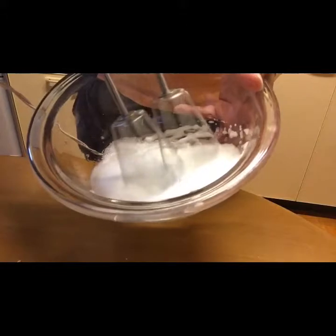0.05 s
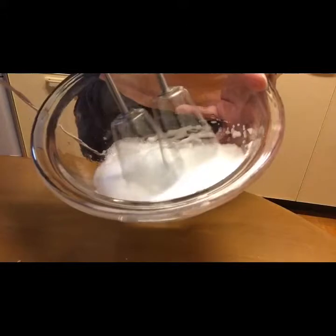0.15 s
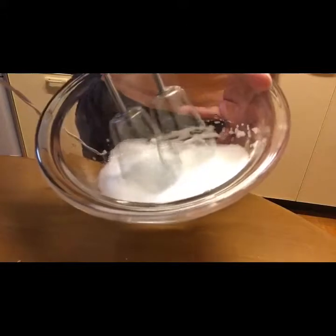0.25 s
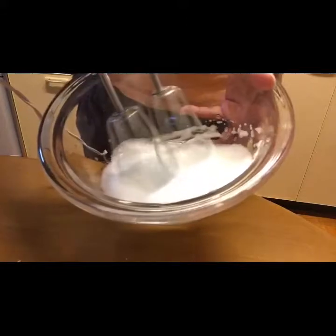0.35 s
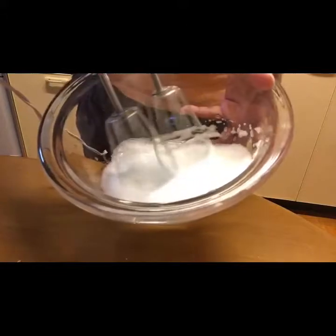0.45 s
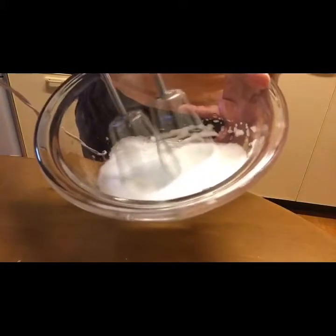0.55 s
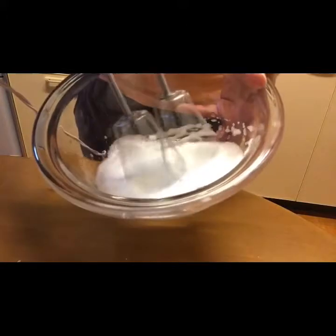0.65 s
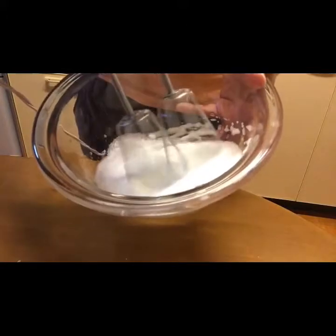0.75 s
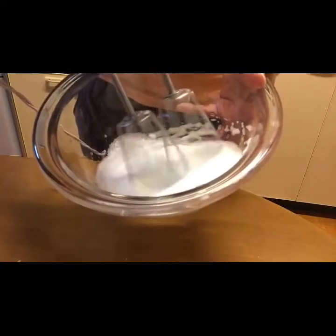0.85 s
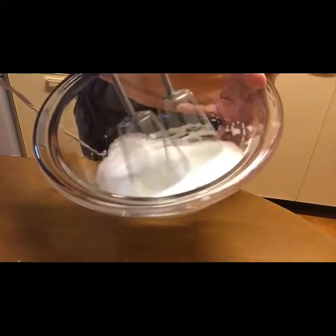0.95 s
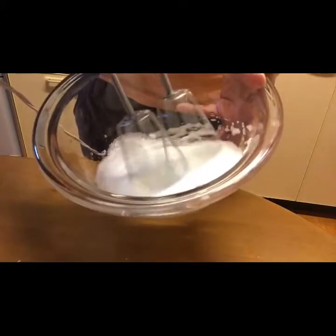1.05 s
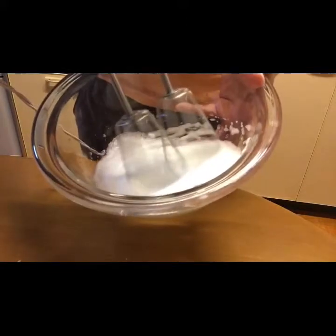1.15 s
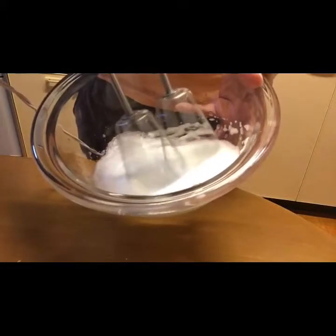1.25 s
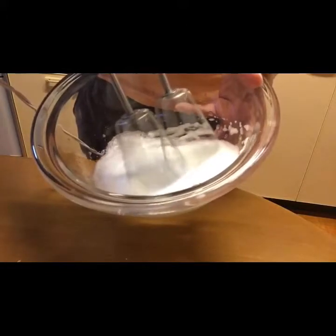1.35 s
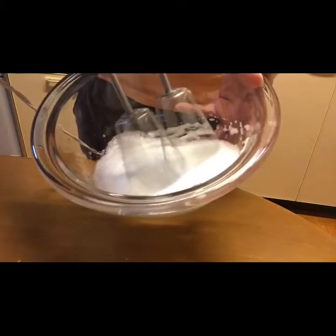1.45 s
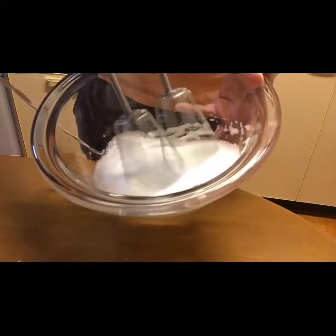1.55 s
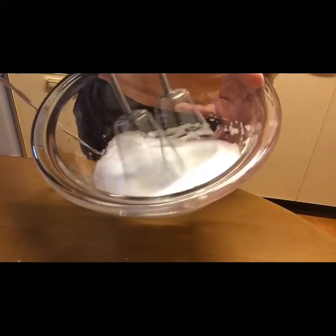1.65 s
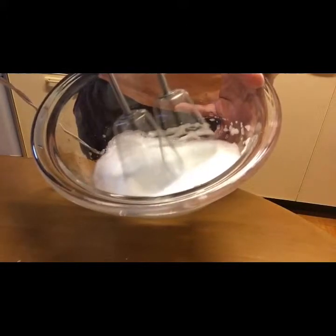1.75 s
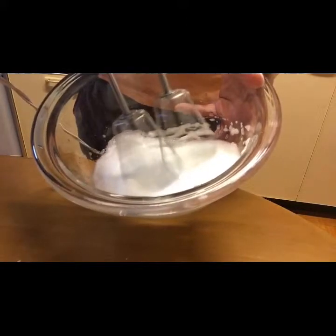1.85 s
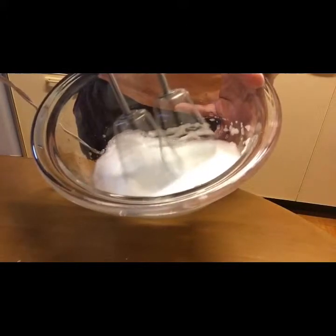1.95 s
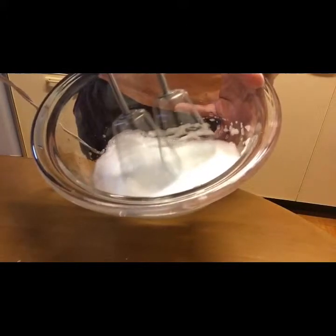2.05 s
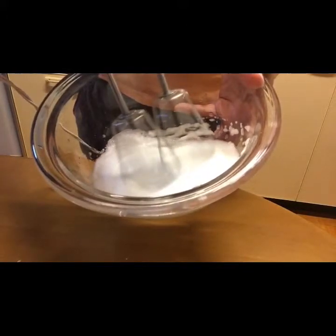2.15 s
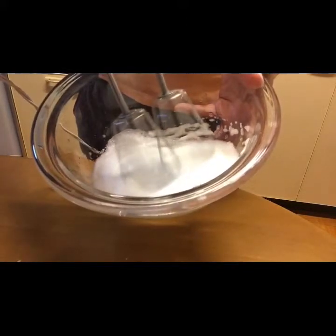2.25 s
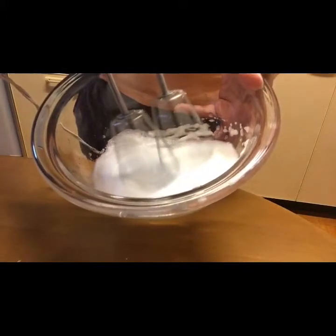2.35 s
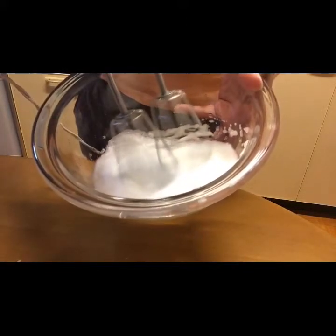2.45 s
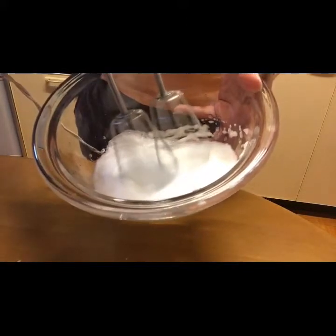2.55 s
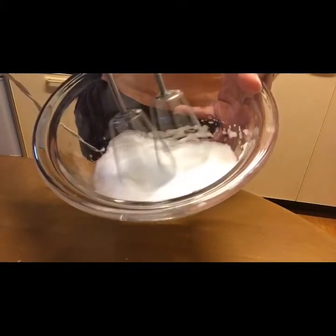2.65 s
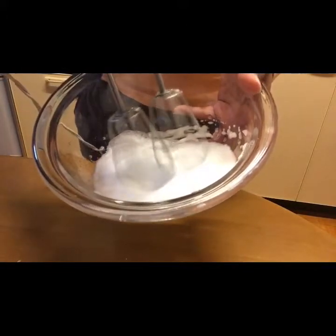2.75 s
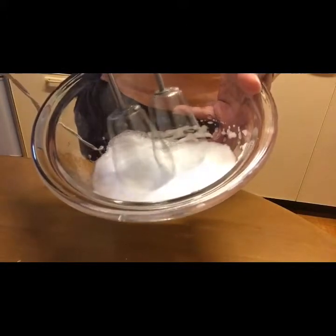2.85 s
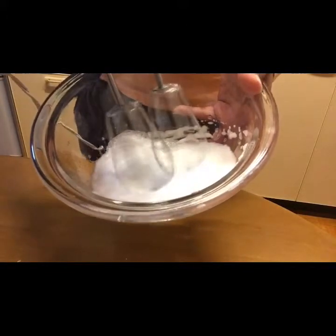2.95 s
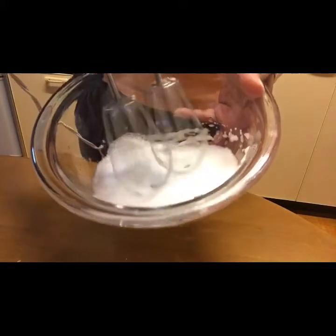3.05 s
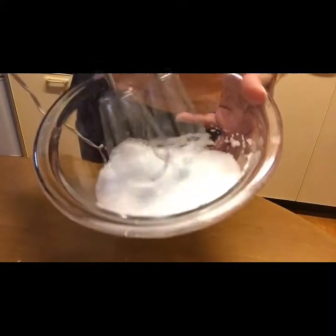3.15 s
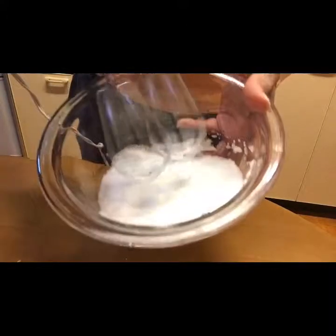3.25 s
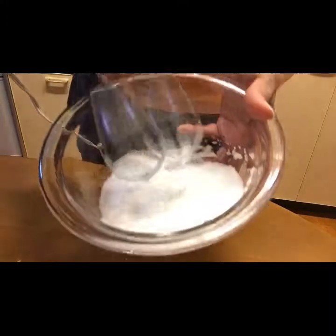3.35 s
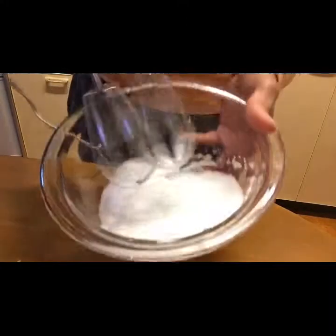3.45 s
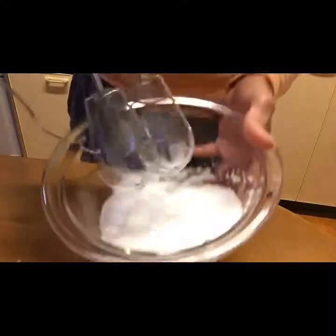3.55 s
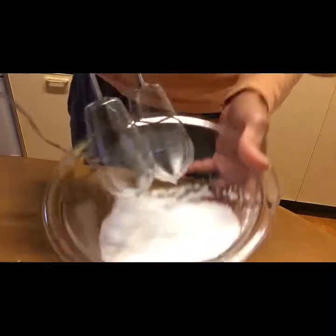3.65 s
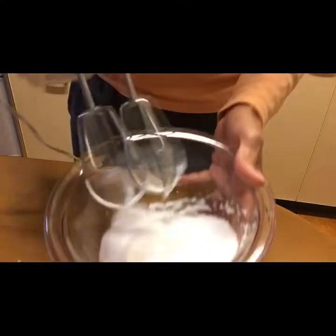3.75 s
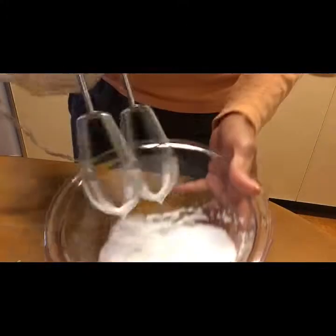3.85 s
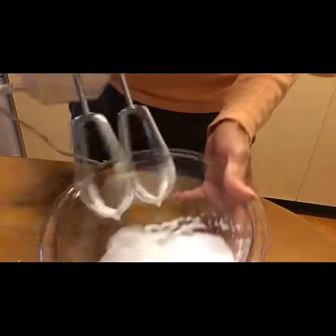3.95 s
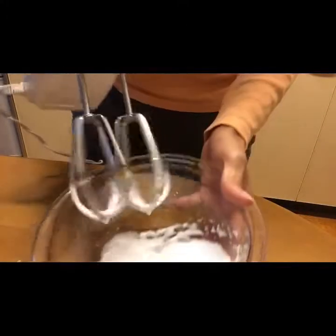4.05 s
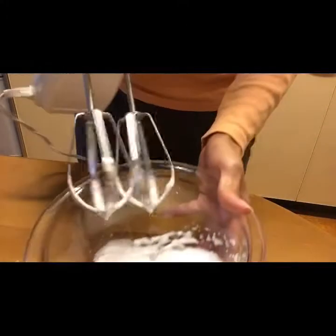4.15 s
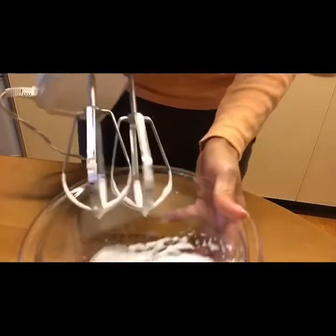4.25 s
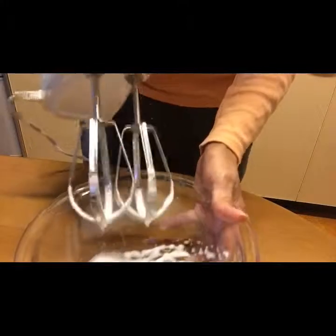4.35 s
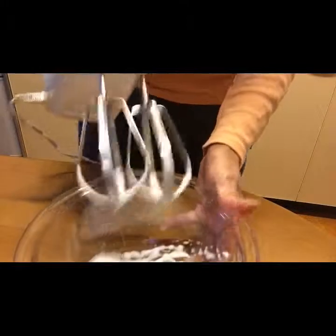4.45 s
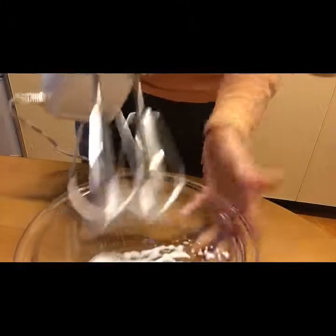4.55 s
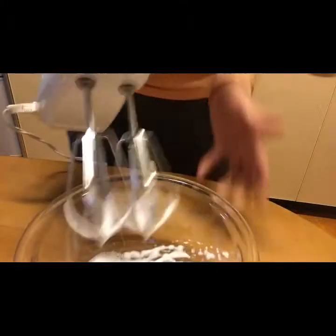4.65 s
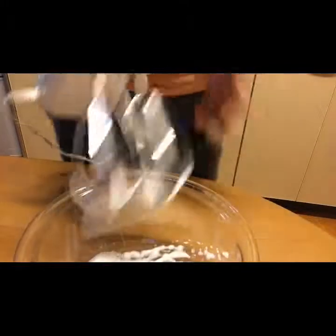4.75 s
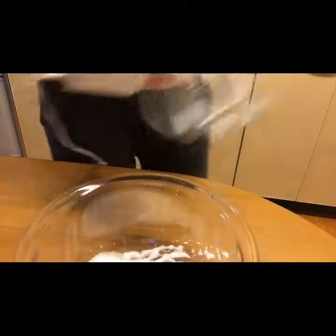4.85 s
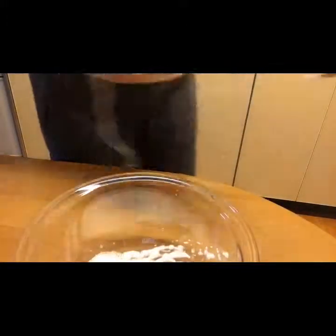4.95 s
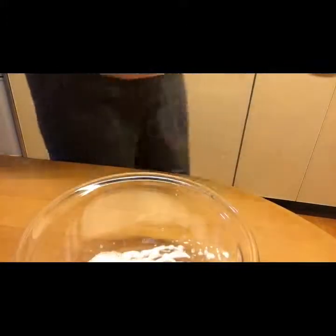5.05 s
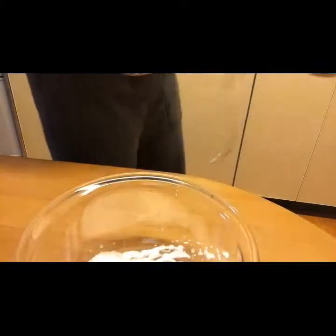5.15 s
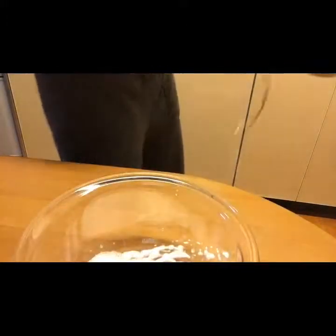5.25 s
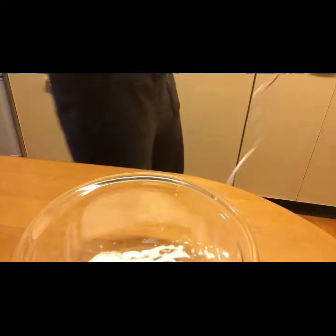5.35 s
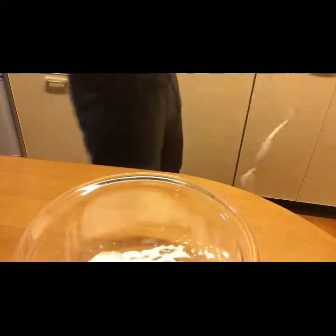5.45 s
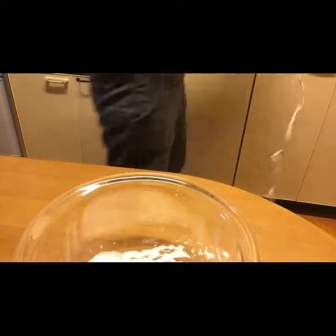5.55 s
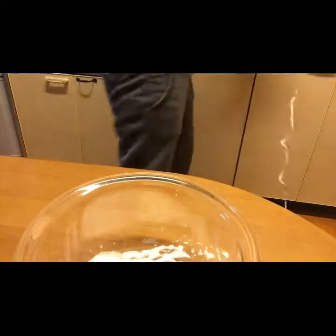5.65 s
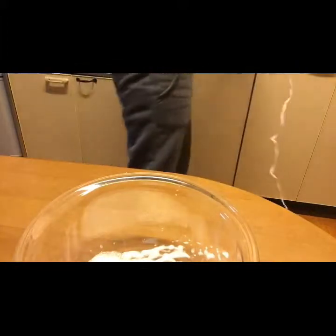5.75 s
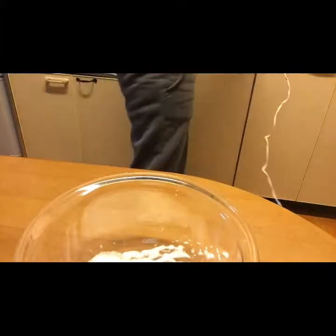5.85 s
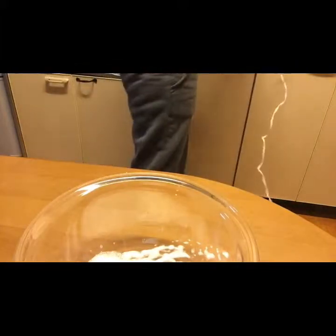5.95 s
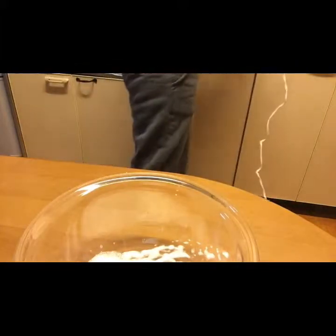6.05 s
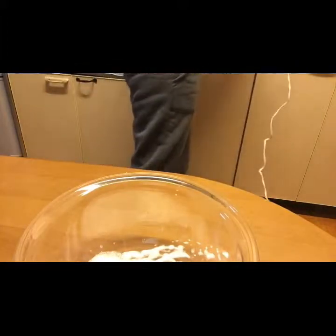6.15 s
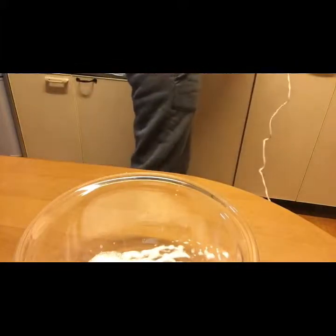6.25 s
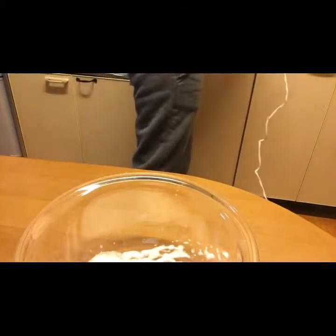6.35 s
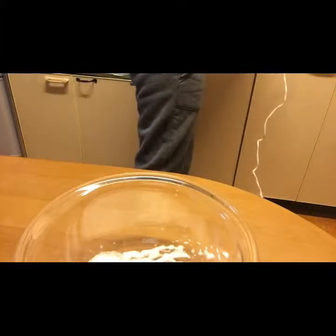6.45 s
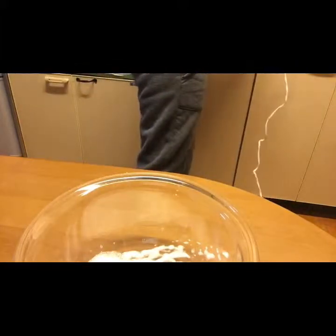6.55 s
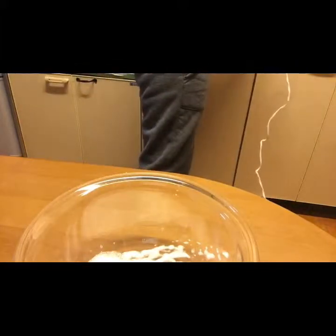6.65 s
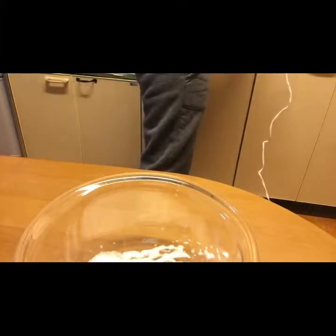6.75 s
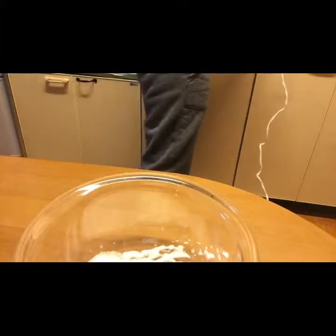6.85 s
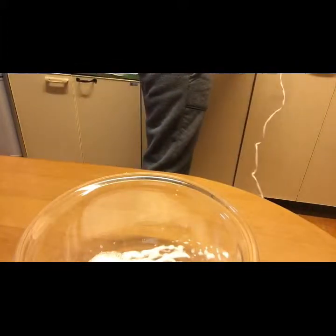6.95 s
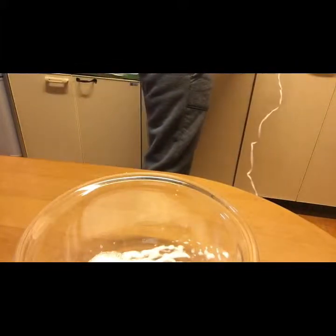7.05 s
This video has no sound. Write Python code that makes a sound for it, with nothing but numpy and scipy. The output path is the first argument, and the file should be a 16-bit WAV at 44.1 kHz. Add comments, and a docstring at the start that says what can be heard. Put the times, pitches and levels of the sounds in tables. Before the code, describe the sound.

Close to the microphone in a small kitchen, a hand mixer runs with a steady motor whine and gear rattle. A few switch clicks slow it, and the beaters tick quickly on a glass bowl as the whine sinks away. Two sharp knocks follow as the bowl is set on a wooden table, with a short ring and boom. Then come quiet plastic taps, rustling clothes and dull thuds.

```python
"""Hand mixer in a glass bowl.

An electric hand mixer whisks egg white in a small kitchen: the motor whines, gears rattle, blades churn.
Its switch clicks down step by step, the beater wires graze the glass and the motor coasts to a stop.
The bowl lands on the wooden table in two knocks; the glass rings and the table top booms.
The mixer is carried off and put aside, with plastic taps, cloth rustle and dull thuds."""
import sys
import numpy as np
from scipy import signal
from scipy.fft import rfft, irfft
from scipy.io import wavfile
from scipy.ndimage import map_coordinates

SR = 44100
rng = np.random.default_rng(int(sys.argv[2]) if len(sys.argv) > 2 else 0)


def master_out(mix):
    """Clip the mix to full scale and print it as 16-bit PCM to the path in sys.argv[1]."""
    frames = np.transpose(np.atleast_2d(mix))
    ceiling = np.clip(frames, -1, 1)
    pcm = np.round(ceiling * 32767).astype(np.int16)
    wavfile.write(sys.argv[1], SR, pcm)


N = 313992
TIME = np.arange(N) / SR
GRID_HZ = np.maximum(np.arange(8193) * SR / 16384, 1)
FULL_TURNS_PER_S, MAINS_HZ = 370.2, 50

# Resonances that swell a tone sweeping across them. Each row: centre in Hz, width in Hz, gain in dB.
SINGING = [(327, 26, 6), (1100, 180, 7.5), (1340, 83, 5.5), (7830, 560, 15.5), (11560, 930, 8)]
# Peaks and hollows of the housing. Each row: centre in Hz, width in Hz, gain in dB.
HOUSING = [(514, 84, -7), (602, 120, 3.5), (860, 130, -4), (2080, 100, 5.5), (2517, 210, 6.5),
           (2760, 140, -1.5), (3030, 260, 9), (3845, 150, -6), (4530, 340, 3), (4900, 190, -15.5),
           (5370, 300, 5), (8700, 300, -1.5), (9300, 500, 4.5), (10200, 430, -4.5)]
# Switch detents, the last is "off". Each row: time in seconds, level in dB, slowing in turns/s per second.
DETENTS = [(1.6099, -15.5, 54), (2.028, -14, 90), (2.3583, -15.5, 131), (2.5835, -24, 179)]
OFF_S = DETENTS[-1][0]
# Spectra of a hard snap and of a knock on plastic. Each row: frequency in Hz, level in dB.
SNAP = [(1500, -26), (4000, -6.5), (8000, -2), (11000, -6), (16000, -6.5)]
PLASTIC = [(300, -16), (850, 1), (1100, 3.5), (1350, 10), (1600, 5.5), (1860, 8), (2500, 0), (3400, 0.5),
           (5000, -6), (7000, -8), (10000, -46.5), (15000, -40.5)]


def from_db(db):
    """Decibels to gain."""
    return 10 ** (np.asarray(db) / 20)


def unit_rms(x):
    """Scale to unit power."""
    return x / np.sqrt(np.mean(x ** 2) + 1e-20)


def at_hz(points, hz):
    """Interpolate a table over log frequency."""
    knots_hz, values = np.transpose(points)
    return np.interp(np.log(hz), np.log(knots_hz), values)


def humps(rows, x):
    """Sum of bell curves, widths taken at half height."""
    return sum(height * 0.5 ** ((2 * (x - centre) / width) ** 2) for centre, width, height in rows)


def response(spectrum, resonances=()):
    """Minimum-phase impulse response of a spectrum, falling away beyond its ends."""
    octaves_below = np.maximum(np.log2(spectrum[0][0] / GRID_HZ), 0)
    octaves_above = np.maximum(np.log2(GRID_HZ / spectrum[-1][0]), 0)
    rolloff_db = 18 * np.minimum(octaves_below + octaves_above, 3)
    db = at_hz(spectrum, GRID_HZ) + humps(resonances, GRID_HZ) - rolloff_db
    cepstrum = irfft(np.log(from_db(db)))
    bins = len(GRID_HZ)
    causal = 2 * cepstrum[:bins] * (np.arange(bins) > 0)
    return irfft(np.exp(rfft(causal, len(cepstrum))))[:bins]


def through(x, impulse):
    """Convolve and trim to the scene."""
    return signal.fftconvolve(x, impulse)[:N]


def hiss(spectrum, resonances=(), gate=1):
    """Unit-power noise, modulated by the gate and then coloured."""
    return unit_rms(through(gate * rng.standard_normal(N), response(spectrum, resonances)))


def drift(rate_hz):
    """Smooth random curve of unit power, up to about this rate."""
    knots = rng.standard_normal(N // 20)
    return unit_rms(map_coordinates(knots, [TIME * rate_hz * 2], order=3, mode="wrap"))


def clicks(rows, db_column=1):
    """One impulse per row, timed by its first column."""
    out = np.zeros(N)
    for row in rows:
        out[int(row[0] * SR)] += from_db(row[db_column])
    return out


def blow(train, spectrum, resonances=()):
    """Each impulse becomes a short coloured blow of the same height."""
    impulse = response(spectrum, resonances)
    return through(train, impulse / np.abs(impulse).max())


def chatter(train, decay_s, share):
    """A hard contact spreads its energy over a dying spray of tiny rebounds."""
    spray = rng.standard_normal(SR // 10) * np.exp(-TIME[:SR // 10] / decay_s)
    rebounds = through(train, spray / np.linalg.norm(spray))
    return (train + share * rebounds) / np.hypot(1, share)


def ringing(modes):
    """Half a second of decaying sines with alternating signs."""
    t = TIME[:SR // 2]
    return sum((-1) ** k * from_db(db - 60 * t / t60_s) * np.sin(2 * np.pi * hz * t)
               for k, (hz, db, t60_s) in enumerate(modes))


def kitchen(x, build_s=0.0044):
    """Diffuse reflections that build up quickly and die sooner in the treble."""
    # Each row: frequency in Hz, T60 in seconds.
    decay = [(100, 0.38), (400, 0.37), (1200, 0.2), (4000, 0.23), (8000, 0.19), (15000, 0.094)]
    t, edges_hz = TIME[:SR], np.geomspace(20, SR / 2, 11)
    white, hz = rfft(rng.standard_normal(SR)), np.arange(SR // 2 + 1)
    tail = 0
    for low, high in zip(edges_hz, edges_hz[1:]):
        band = irfft(white * (hz >= low) * (hz < high))
        tail += band * from_db(-60 * t / at_hz(decay, np.sqrt(low * high)))
    tail *= 1 - np.exp(-(t / build_s) ** 2)
    return through(x, tail / np.linalg.norm(tail))


def room_tone():
    """Faint kitchen noise with a hum."""
    # Each row: frequency in Hz, relative density in dB.
    spectrum = [(15, -33.5), (25, -10.5), (59, -9.5), (180, -0.5), (309, -9.5), (503, -13), (591, -17.5),
                (887, -13), (988, -19), (1520, -16), (2000, -22.5), (4250, -34), (4740, -36), (5140, -36.5),
                (16000, -57)]
    # Each row: centre in Hz, width in Hz, gain in dB.
    hum = [(167, 39, 10), (1370, 250, 4)]
    return from_db(-51.5) * hiss(spectrum, hum)


def cloth(attack_s=0.053, release_s=0.049):
    """Clothes rub: each stroke swells, holds and dies away, roughened by the folds."""
    # Each row: start in seconds, length in seconds, rustle in dB, fine swish in dB.
    strokes = [(4.096, 0.53, -62.5, -74), (4.83, 0.11, -54, -74), (5.016, 0.23, -70, -75),
               (5.456, 0.34, -62, -88), (5.8, 0.29, -63.5, -69), (6.74, 0.073, -67.5, -89)]
    # Each row: frequency in Hz, relative density in dB.
    rustle_spectrum = [(2000, 5), (3500, 3), (6000, -2), (8000, -12.5), (10000, -17)]
    swish_spectrum = [(7000, 10), (10000, 4), (16000, 2)]
    rustle = swish = 0
    for start_s, length_s, rustle_db, swish_db in strokes:
        rise = np.clip((TIME - start_s) / attack_s, 0, 1)
        fall = np.exp(-np.maximum(TIME - start_s - length_s, 0) / release_s)
        rustle += from_db(rustle_db) * rise * fall
        swish += from_db(swish_db) * rise * fall
    folds = from_db(1.5 * drift(44))
    return rustle * hiss(rustle_spectrum, gate=folds) + swish * hiss(swish_spectrum, gate=folds)


def thuds():
    """Steps and things put down, each with one low resonance."""
    # Each row: time in seconds, relative level in dB, boom in Hz.
    impacts = [(5.17, -38, 276), (5.55, -47, 95), (6.382, -29.5, 180), (6.402, -29, 174),
               (6.445, -36.5, 129), (6.521, -52, 140), (6.781, -49.5, 159), (6.88, -50, 65),
               (6.934, -49, 120), (7.08, -40.5, 247)]
    # Each row: frequency in Hz, level in dB.
    spectrum = [(25, 0), (60, 10.5), (110, 7), (190, 7), (300, 8.5), (600, 1), (1400, -6.5), (3000, -25),
                (8000, -70)]
    direct = sum(blow(clicks([(s, db)]), spectrum, [(hz, 90, 13)]) for s, db, hz in impacts)
    return from_db(3) * direct + from_db(1.5) * kitchen(direct)


def taps():
    """The plastic body and cord tap against things, wetter when far away."""
    # Each row: time in seconds, relative level in dB, room offset in dB, bright edge offset in dB.
    contacts = [(3.763, -30.5, 1, -15), (4.676, -45, -16, -22), (4.709, -40, 1.5, -15),
                (4.903, -46, 12.5, -7), (4.9707, -24.5, -10, 3.5), (4.974, -23, -4.5, -18),
                (5.167, -37, 3, -14), (6.0112, -35, 15, 0.5), (6.0153, -28.5, -14, 4.5),
                (6.378, -39, 5.5, -4.5), (6.905, -44, 4, -15), (7.076, -53, 5, -27)]
    # Each row: frequency in Hz, level in dB.
    edge_spectrum = [(3000, -21), (5500, -0.5), (7000, -0.5), (8200, -11), (10000, -18.5), (15500, -32)]

    def strike(rows):
        return blow(clicks(rows), PLASTIC) + blow(clicks(rows, db_column=2), edge_spectrum)

    near = strike([(s, db, db + edge) for s, db, _, edge in contacts])
    far = strike([(s, db + room, db + room + edge) for s, db, room, edge in contacts])
    return from_db(7.5) * chatter(near, decay_s=0.0036, share=8.8) + from_db(3) * kitchen(far)


def bowl():
    """The glass base knocks on the wood, rings and grinds as it rocks; the table top booms."""
    # Each row: time in seconds, then relative levels in dB of crack, glass ring, table boom, grit.
    knocks = [(4.0160, -2.5, -14, -10.5, -27), (4.0240, -26, -42, -17.5, -18), (4.047, -32, -39, -39, -22),
              (4.070, -19, -36, -27, -21), (4.4225, -8, -11.5, -23, -24.5)]
    # Each row: frequency in Hz, level in dB, T60 in seconds.
    glass_modes = [(668, -6.5, 0.1), (840, 1.5, 0.036), (1004, -4.5, 0.061), (1465, -1.5, 0.042),
                   (1660, -13, 0.063), (1973, -4.5, 0.024), (2480, -18, 0.027), (2870, -33, 0.15),
                   (3540, -32, 0.19), (4460, -31, 0.14), (4700, -46, 0.11), (5690, -23, 0.11),
                   (5600, -30, 0.038), (6300, -32, 0.12), (6760, -32, .06)]
    table_modes = [(65, -17, 0.24), (144.6, -6, 0.27), (205.5, 3.5, 0.077), (327, -0.5, 0.086),
                   (394.4, -4.5, 0.16), (512, -9, 0.1)]
    # Each row: frequency in Hz, level in dB.
    crack_spectrum = [(45, -7), (150, -4.5), (400, 3.5), (800, -3), (1400, -4.5), (2300, -12),
                      (3000, -17.5), (4200, -25.5), (6000, -20.5), (7500, -42), (9500, -38), (15000, -68)]
    crack = blow(chatter(clicks(knocks), decay_s=0.004, share=1.6), crack_spectrum)
    glass = through(clicks(knocks, db_column=2), ringing(glass_modes))
    boom = through(clicks(knocks, db_column=3), ringing(table_modes))
    grit = blow(chatter(clicks(knocks, db_column=4), decay_s=0.02, share=8.7), SNAP)
    room = from_db(0.5) * kitchen(crack) + from_db(-11) * kitchen(boom + glass)
    return from_db(4.5) * crack + glass + boom + grit + room


def grazes():
    """Beater wire on glass: a clack and a ping, its modes weighted anew at each touch."""
    # Each row: time in seconds, relative level in dB.
    touches = [(2.49, -18), (2.5309, -24), (2.5504, -19), (2.6049, -19), (2.6365, -18), (2.684, -18.5),
               (2.6953, -17), (2.716, -15.5), (2.8052, -19.5), (2.8194, -18.5), (2.8633, -30),
               (2.8958, -21)]
    # Each row: frequency in Hz, level in dB, T60 in seconds.
    wire_modes = [(1013, 2, 0.1), (1580, -5.5, 0.12), (2440, -9, .06), (3300, -14, .06), (3410, 0.5, 0.05),
                  (5300, -17, 0.049), (6430, -6.5, .07), (8600, -14.5, 0.056), (9120, -15, 0.1),
                  (9570, -19, .05), (10620, -17, 0.095), (11730, -22, .05), (13720, -15, .05)]
    scatter_db = rng.normal(0, 3, (len(touches), len(wire_modes)))
    contact = chatter(clicks(touches), decay_s=0.0046, share=3.6)
    out = from_db(5.5) * blow(contact, PLASTIC) + from_db(-8) * blow(contact, SNAP)
    for (s, touch_db), extras_db in zip(touches, scatter_db):
        ping = ringing([(hz, db + extra, t60_s) for (hz, db, t60_s), extra in zip(wire_modes, extras_db)])
        start = int(s * SR)
        out[start:start + len(ping)] += from_db(touch_db - 7.5) * ping
    return out


def switch():
    """The slider snaps from one detent to the next."""
    snap = blow(chatter(clicks(DETENTS), decay_s=0.0044, share=3), SNAP)
    return from_db(10) * snap + from_db(-2.5) * kitchen(snap)


def motor_speed(drag_per_s=0.09):
    """Turns per second: sags faster after each detent, then coasts against friction and air drag."""
    # The motor races a little as the load eases. Each row: centre and width in seconds, extra turns/s.
    easing = [(1.38, 0.44, 2.7)]
    slowing = np.zeros(N)
    for s, _, rate in DETENTS:
        slowing[int(s * SR):] = rate
    slowing *= np.exp(-drag_per_s * np.maximum(TIME - OFF_S, 0))
    speed = FULL_TURNS_PER_S + humps(easing, TIME) - np.cumsum(slowing) / SR
    return np.maximum(speed, 1) * (1 + 0.00057 * drift(15))


def speed_gain(speed, full_db, half_loss_db, bend):
    """Drive noise falls with speed; a bend of 1 loses the same dB at every halving."""
    halvings = np.maximum(np.log2(FULL_TURNS_PER_S / speed), 0)
    return from_db(full_db - half_loss_db * halvings ** bend)


def bearings(speed):
    """A thin sliding hiss that lasts to the final turns."""
    # Each row: frequency in Hz, relative density in dB.
    spectrum = [(3600, -10.5), (4400, -1.5), (5000, -15.5), (6300, -13.5), (8000, -23), (15000, -27.5)]
    return speed_gain(speed, full_db=-47.5, half_loss_db=4.4, bend=0.93) * hiss(spectrum)


def brushes(speed, spark_depth=0.098):
    """The brushes hiss; under power their sparks pulse at twice the mains frequency."""
    # Each row: frequency in Hz, relative density in dB.
    spectrum = [(3820, -33), (6500, -4), (7790, -6.5), (8460, -10), (9550, -13), (10100, -11), (11000, -13),
                (15100, -15), (16000, -23)]
    sparks = 1 + spark_depth * np.cos(2 * np.pi * 2 * MAINS_HZ * TIME) * (TIME < OFF_S)
    return speed_gain(speed, full_db=-35, half_loss_db=21, bend=1) * hiss(spectrum, HOUSING, sparks)


def beaters(speed, blades, lift_s=2.3, rise_s=0.25):
    """Lifted out of the foam, the beaters hum and drive the singing resonances."""
    # Each row: frequency in Hz, relative density in dB.
    spectrum = [(850, -32.5), (1080, -6), (1170, -5), (1290, -3), (1500, -24.5)]
    lifted = np.clip((TIME - lift_s) / rise_s, 0, 1)
    singing = from_db(0.79 * humps(SINGING, 4 * speed))
    gain = speed_gain(speed, full_db=-39, half_loss_db=3.9, bend=2.4)
    return lifted * singing * gain * hiss(spectrum, gate=blades)


def churn(speed, pulses):
    """The blades churn the foam: pulsing noise, coloured by the housing."""
    # Each row: frequency in Hz, relative density in dB.
    spectrum = [(24, -59.5), (40, -25.5), (184, -14), (232, -6.5), (292, -8), (369, -4.5), (497, -8),
                (727, -5.5), (790, -6), (887, -7.5), (1080, -2), (1180, -4), (1430, 1.5), (1870, -2.5),
                (2100, -7), (2730, -38), (4620, -120)]
    return speed_gain(speed, full_db=-26.5, half_loss_db=9.6, bend=1.18) * hiss(spectrum, HOUSING, pulses)


def gears(speed, teeth, shaft_rad):
    """Gears rattle in the housing; play in the beater shafts throbs once a turn."""
    # Each row: frequency in Hz, relative density in dB.
    spectrum = [(1200, -28.5), (1900, -16.5), (2300, -8), (3000, -4.5), (3700, -9.5), (4500, -10),
                (6000, -15), (7500, -26), (10000, -37)]
    throb = 1 + 0.13 * np.cos(shaft_rad + drift(3))
    flutter = from_db(-0.05 * drift(25))
    gain = speed_gain(speed, full_db=-20.5, half_loss_db=16, bend=1.09)
    return gain * hiss(spectrum, HOUSING, teeth * throb * flutter)


def whine(speed, motor_rad, glide_flicker_db=3.5, top_hz=15900):
    """Armature partials with side tones from mains torque ripple; they flicker in the room as they glide."""
    # Each row: multiple of the turning rate, base level in dB, loss at half speed in dB.
    partials = [(0.998, -42, 38), (2.003, -40, 90.5), (3.007, -42, 23.5), (4.004, -39, 12.5),
                (5, -51, 26.5), (6, -41, 10.5), (9.01, -31, 75.5), (12.22, -40.5, 35), (13, -43, 37),
                (24, -55.5, 22.5), (35.6, -66.5, 20), (72, -67, 6), (96.3, -66, 3.5)]
    halvings = np.log2(speed.max() / speed)
    gliding = np.minimum(np.sqrt(halvings), 1)
    ripple_rad = 0.1 * np.sin(2 * np.pi * 2 * MAINS_HZ * TIME) * (TIME < OFF_S)
    out = 0
    for multiple, db, loss_db in partials:
        hz = multiple * speed
        flicker_db = 0.1 * drift(3.93) + glide_flicker_db * gliding * drift(14)
        rms = from_db(db - loss_db * halvings ** 2 + humps(SINGING, hz) + flicker_db) * (hz < top_hz)
        out += np.sqrt(2) * rms * np.sin(multiple * motor_rad + ripple_rad)
    return out


def mixer(gear_ratio=24):
    """The motor drives four-bladed beaters through gears; all of it fades with the last turns."""
    speed = motor_speed()
    motor_rad = 2 * np.pi * np.cumsum(speed) / SR
    shaft_rad = motor_rad / gear_ratio
    teeth = (1 + 0.16 * np.cos(motor_rad)) * from_db(0.1 * drift(150))
    blades = 1 + 0.1 * np.cos(4 * shaft_rad)
    fade = np.clip(speed / 55, 0, 1) ** 2
    return fade * (gears(speed, teeth, shaft_rad) + churn(speed, teeth * blades) + brushes(speed)
                   + beaters(speed, blades) + bearings(speed) + whine(speed, motor_rad))


def scene():
    """All sources at one microphone, alike in both channels."""
    mono = room_tone() + mixer() + switch() + grazes() + bowl() + taps() + cloth() + thuds()
    return np.tile(mono, (2, 1))


def record(dry, low_hz=43.3, top_hz=15900):
    """A small microphone: deep bass lost, peaks rounded, top cut."""
    thin = signal.sosfilt(signal.butter(3, low_hz, "high", fs=SR, output="sos"), dry)
    rounded = 1.2 * np.tanh(thin / 1.2)
    return signal.sosfilt(signal.ellip(12, 0.1, 80, top_hz, fs=SR, output="sos"), rounded)


dry = scene()
out = record(dry)
master_out(out)
```